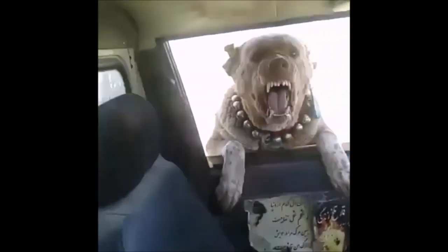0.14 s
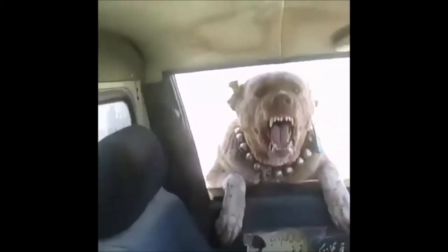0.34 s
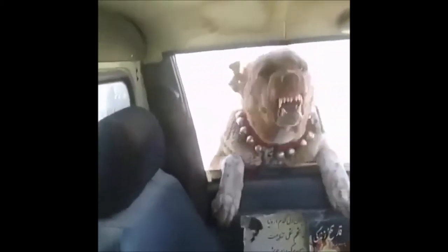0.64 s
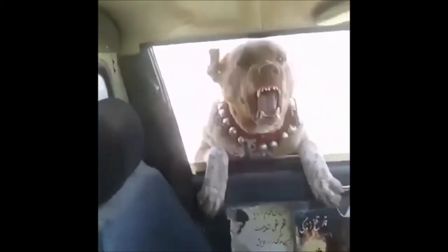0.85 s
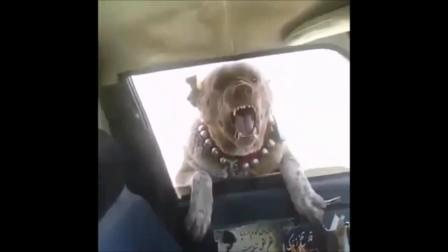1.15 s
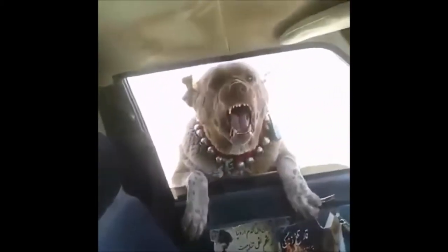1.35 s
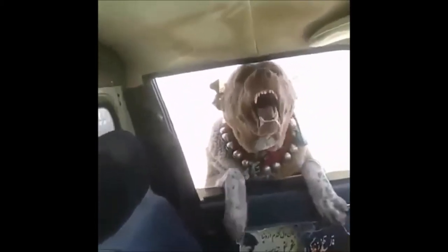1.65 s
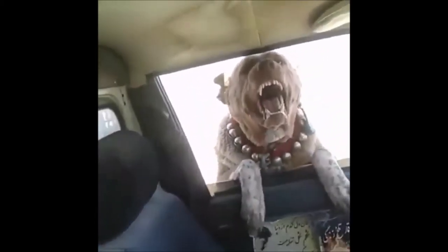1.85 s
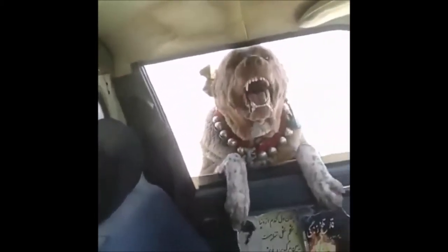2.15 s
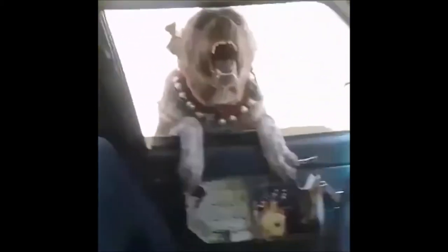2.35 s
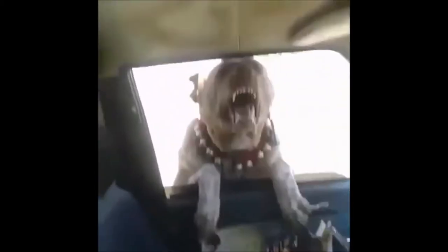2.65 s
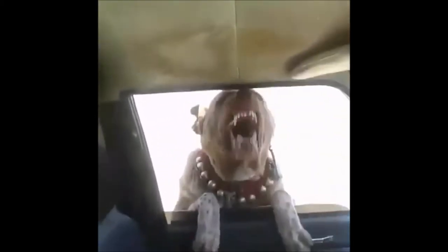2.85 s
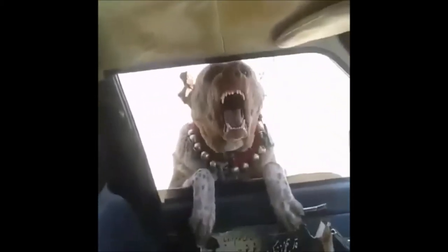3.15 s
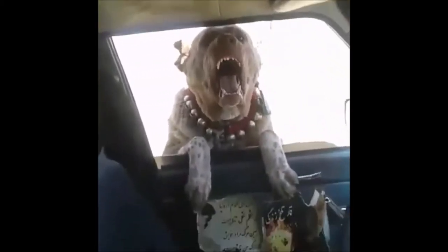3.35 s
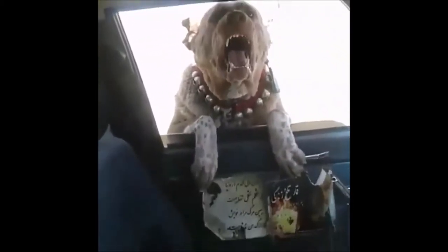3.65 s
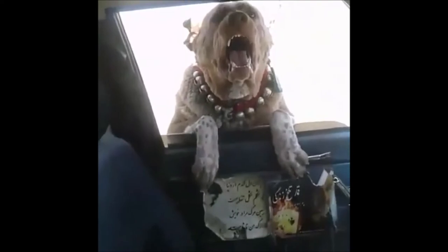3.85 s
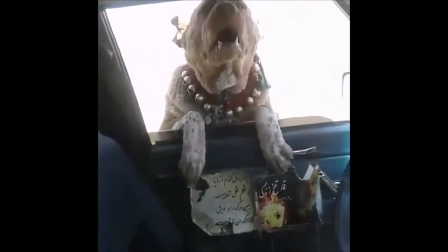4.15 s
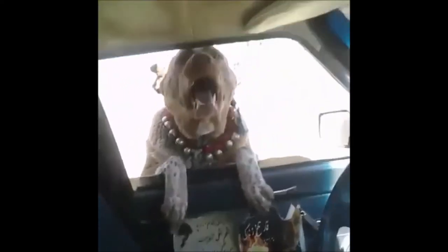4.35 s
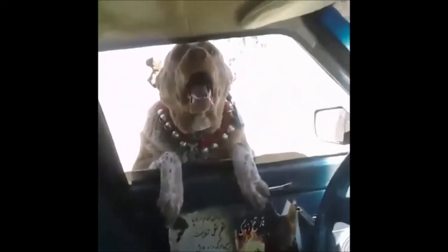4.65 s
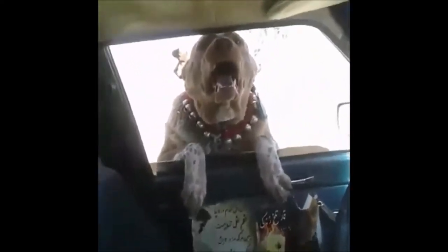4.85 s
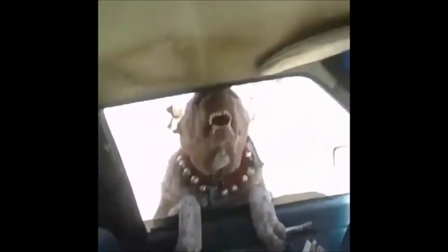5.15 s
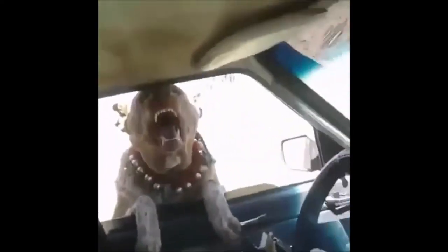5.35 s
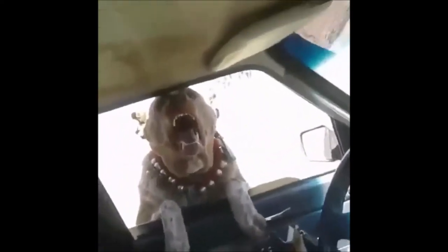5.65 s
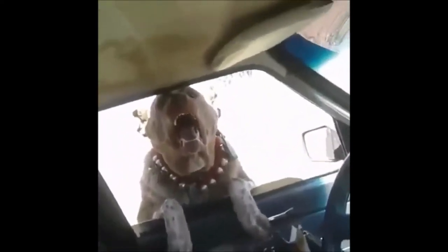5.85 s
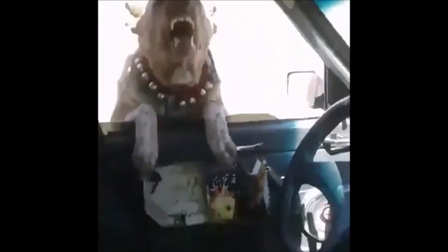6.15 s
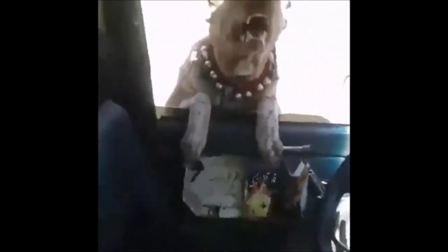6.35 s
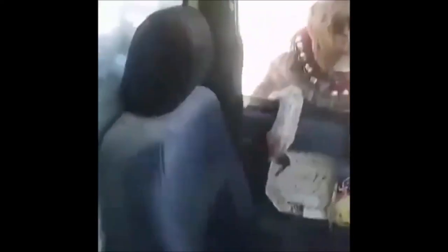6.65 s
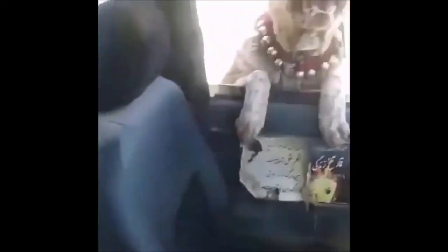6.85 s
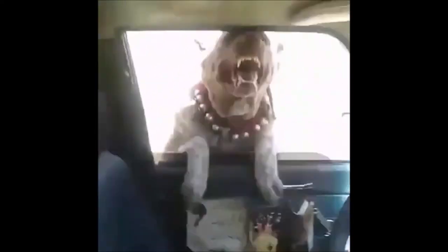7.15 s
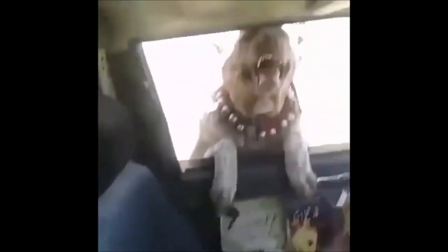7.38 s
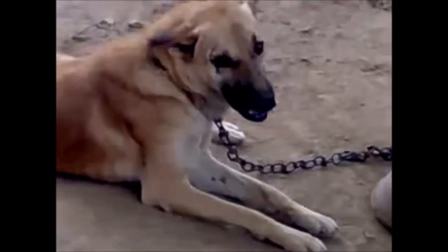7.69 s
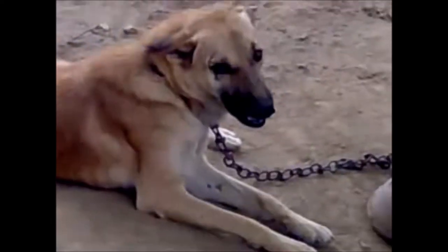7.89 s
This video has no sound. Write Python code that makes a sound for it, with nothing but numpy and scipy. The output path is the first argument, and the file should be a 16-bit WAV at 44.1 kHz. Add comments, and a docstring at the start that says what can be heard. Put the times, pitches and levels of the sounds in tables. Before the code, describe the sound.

Close, loud and slightly overdriven: a heavy dog draws snarling, hissing breaths and throws out single rough barks about a second apart, each running out in a huff or a slow throaty growl. Air whistles briefly past the teeth and a claw ticks once. Near the end the fury cuts off; faint outdoor air, a muffled low moan, a thin whine and a tiny metallic tick remain.

```python
"""Inside a car cabin, a big dog rages through the open window; then a quiet yard with a dog most likely at rest.
Snarling in-breaths flutter the soft palate in hiss; barks are rough vocal-fold pulses sent through resonances.
Each bark runs out in a huff of turbulent noise or a growl of slow throat closures; teeth whistle, a claw ticks.
The fury stops dead: a closed-mouth moan of few harmonics, a faint whine and one tick of a chain follow."""
import sys
import numpy as np
from scipy import signal
from scipy.fft import rfft, irfft, next_fast_len
from scipy.io import wavfile
from scipy.ndimage import uniform_filter1d

SR = 44100
rng = np.random.default_rng(int(sys.argv[2]) if len(sys.argv) > 2 else 0)


def file_out(sig):
    """Save sig as 16-bit WAV at sys.argv[1]."""
    # one column per channel
    cols = np.atleast_2d(sig).T
    # limit, then scale
    lim = np.clip(cols, -1, 1)
    pcm = np.round(lim * 32767).astype(np.int16)
    wavfile.write(sys.argv[1], SR, pcm)


N = 353682
TIME = np.arange(N) / SR
FFT_SIZE = 2 * next_fast_len(N // 2 + SR // 4)
HZ = np.maximum(np.arange(FFT_SIZE // 2 + 1) * SR / FFT_SIZE, 1)
THROAT_TOP_HZ, MOUTH_TOP_HZ = 820, 3200  # borders between the throat, mouth and hiss registers

# barks: start_s, crest_after_s, length_s, sag_db_per_s, throat_db, mouth_db, hiss_db,
# mouth_resonance_hz, closing_fall_hz (fall of pitch); the register shape scales the crest time and adds to the sag
BARKS = [(0.599, 0.1, .19, 99.5, -9.5, -18, -21.5, 1360, 48),
         (1.526, 0.11, .2, 90, -11.5, -20.5, -23, 1180, 12),
         (2.856, 0.19, .205, 88, -6, -20, -20.5, 1327, 68),
         (4.077, 0.07, .19, 49, -7.5, -19, -23, 1264, 16),
         (5.035, 0.12, .175, 56, -10.5, -20.5, -24, 1330, 48),
         (6.109, 0.12, .205, 77, -12, -19, -23.5, 1220, 10)]
# hard slaps of the throat within a growl: time_s, band_gain_db (gain of one band at the slap)
SLAPS = [(1.784, 6), (2.113, 2), (2.223, 0), (2.658, 6), (2.686, -1), (2.765, -2), (6.415, 6), (6.502, 9.5),
         (6.573, 7), (6.851, 4), (6.93, 6), (7.048, 7.5), (7.088, 0), (7.167, 5), (7.299, 4), (7.341, 3),
         (7.423, 2)]


def from_db(db):
    """Level to amplitude: 20 dB is a factor of ten."""
    return 10 ** (np.asarray(db) / 20)


def rms_one(x):
    """Normalization to unit mean power."""
    return x / np.sqrt(np.mean(x ** 2) + 1e-20)


def in_time(rows):
    """Linear interpolation of each column of a curve, sample by sample."""
    s, *columns = np.transpose(rows)
    return [np.interp(TIME, s, column) for column in columns]


def drift(per_s):
    """Slow random modulation: unit-power noise with per_s random points a second, joined by lines."""
    return rms_one(np.interp(TIME * per_s, np.arange(N // 20), rng.standard_normal(N // 20)))


def cut(x, hz, kind, order=2):
    """Butterworth filtering: a maximally flat passband."""
    return signal.sosfilt(signal.butter(order, hz, kind, fs=SR, output="sos"), x + 1e-18)


def spectrum_db(points):
    """Spectral envelope: levels interpolated over the logarithm of frequency."""
    hz, db = np.transpose(points)
    return np.interp(np.log(HZ), np.log(hz), db)


def lifts(modes):
    """Resonance: a bell of gain in dB round each mode, the width taken at half its dB."""
    return sum(db / (1 + (2 * (HZ - hz) / width) ** 2) for hz, width, db in modes)


def resonate(x, db):
    """Causal (minimum-phase) filtering of the given gain: resonances ring after each pulse."""
    cepstrum = irfft(np.log(from_db(db)))
    # fold the cepstrum onto positive times
    cepstrum[1:FFT_SIZE // 2] *= 2
    cepstrum[FFT_SIZE // 2 + 1:] = 0
    return irfft(rfft(x, FFT_SIZE) * np.exp(rfft(cepstrum)))[:N]


def glide(x, hz, width_hz, lift_db):
    """Resonance with a moving centre: the signal is shifted to zero frequency, smoothed and shifted back."""
    turn = np.exp(2j * np.pi * np.cumsum(hz) / SR)
    r = np.exp(-np.pi * width_hz / SR)
    band = 2 * np.real(turn * signal.lfilter([1 - r], [1, -r], x / turn))
    return x + (from_db(lift_db) - 1) * band


def swell(s, length):
    """Gaussian envelope of height 1, its length taken between the 1/e points."""
    return np.exp(-np.minimum((2 * (TIME - s) / length) ** 2, 60))


def dying(clicks, length_s):
    """Damped decay: each click falls exponentially, to 1/e in length_s."""
    return signal.lfilter([1], [1, -np.exp(-1 / (length_s * SR))], clicks + 1e-18)


def tick(at_s, level_db, t60, low_hz, high_hz):
    """Impact: a small hard contact bursts into band noise that decays by 60 dB in t60 seconds."""
    age = TIME - at_s
    noise = rms_one(cut(rng.standard_normal(N), [low_hz, high_hz], "band"))
    return from_db(level_db - 60 * np.abs(age) / t60) * (age > 0) * noise


def hush():
    """Background noise: a faint rush of random pressure, low-passed at 6 dB per octave."""
    return from_db(-70.5) * rms_one(cut(rng.standard_normal(N), 900, "low", order=1))


def yard_air():
    """Coloured noise: outdoor air round the resting dog, shaped by a spectral envelope."""
    # spectrum of the outdoor air: frequency_hz, relative_level_db
    air_colour = [(18, -51), (30, -7.5), (57, -11), (115, -31), (174, -34.5), (3370, -39), (7000, -43),
                  (9100, -94)]
    return from_db(-56.0) * rms_one(resonate(rng.standard_normal(N), spectrum_db(air_colour)))


def whine(at_s=7.79, length_s=0.22, hz=2290, level_db=-66):
    """Frequency glide: a thin, faint whistle that slides up and holds."""
    pitch = hz * (1 - .16 * np.clip((at_s - TIME) / length_s * 2, 0, 1) ** 2)
    return from_db(level_db) * swell(at_s, length_s) * np.sin(2 * np.pi * np.cumsum(pitch) / SR)


def moan():
    """Harmonic series behind a closed muzzle, which lets only the lowest harmonics out."""
    # course of the moan: time_s, pitch_hz, level_db
    course = [(7.606, 134.5, -43), (7.8, 125.5, -43), (7.85, 114, -43), (7.87, 97.9, -59),
              (8.02, 91.4, -86)]
    # harmonics: multiple of the pitch, relative_level_db
    harmonics = [(1, 16), (2, 9), (3, -13)]
    hz, db = in_time(course)
    angle = 2 * np.pi * np.cumsum(hz * (1 + 0.01 * drift(80))) / SR
    tone = sum(from_db(level) * np.cos(round(k) * angle) for k, level in harmonics)
    return from_db(db + 1.4 * drift(85)) * rms_one(tone)


def cabin(x, t60=0.019, wet_db=-5):
    """Reverberation: dense, short reflections off glass and upholstery."""
    t = TIME[:SR // 5]
    echoes = rng.standard_normal(len(t)) * from_db(-60 * t / t60) * (t > .002)
    return x + from_db(wet_db) * signal.fftconvolve(x, echoes / np.linalg.norm(echoes))[:N]


def sway(x, sway_s=.00008):
    """Comb filtering: near echoes ripple the hiss; the ripples wander slowly."""
    # echoes off window frame and roof: lag_s, amplitude_ratio
    near_echoes = [(.0007, 0.18), (.0029, 0.086), (.0043, 0.3)]
    return x + sum(echo * np.interp(TIME - lag - sway_s * drift(4), TIME, x) for lag, echo in near_echoes)


def effort(breaths, shape):
    """Breath envelope: throat, mouth and hiss levels in dB open, climb to a crest, sag and close."""
    closing_db, opening_db_per_s = 59.5, 4991.5  # depth at the end of a breath; snap of the airway opening
    levels = np.full((3, N), -120.0)
    for breath in breaths:
        start, crest_s, length, sag, *crest_db = breath[:7]
        age = TIME - start
        for k, (share, rise, added_sag, attack_db, attack_s, release_s) in enumerate(shape):
            past = age - share * crest_s
            arch = np.where(past < 0, rise * past, -(sag + added_sag) * past)
            attack = attack_db * np.maximum(1 - age / attack_s, 0) ** 2
            opening = attack + opening_db_per_s * np.maximum(-age, 0)
            closing = closing_db * np.maximum(1 - (length - age) / release_s, 0) ** 2
            levels[k] = np.maximum(levels[k], crest_db[k] + arch - opening - closing)
    return levels


def breathe(voice, air, colour, levels_db, steady_s, throat_share=1):
    """Source and filter: voice and air pass the resonances; three registers then follow the breath's effort."""
    # resonances of muzzle and cabin: frequency_hz, width_hz, lift_db
    body_modes = [(116, 87, 7), (218.4, 212, 15.5), (443, 119, 11.5), (590, 92.3, 21.5), (659.7, 96, 21.5),
                  (686, 19, 4.5), (937, 115, 8), (1071.5, 120, 7.5), (1239, 25, 8), (1459, 140, 8),
                  (1587, 45, 7), (1834, 36, 9), (2006, 69, 8.5), (2190, 22, 11), (4700, 38, 10),
                  (6160, 170, 4)]
    gain_db = spectrum_db(colour) + lifts(body_modes)
    voice, air = resonate(voice, gain_db), resonate(air, gain_db)
    throat = rms_one(cut(voice, THROAT_TOP_HZ, "low", order=6))
    mouth = cut(voice + air, [THROAT_TOP_HZ, MOUTH_TOP_HZ], "band", order=6)
    hiss = sway(cut(air, MOUTH_TOP_HZ, "high", order=6))
    out = 0
    for register, db, share in zip((throat, mouth, hiss), levels_db, (throat_share, 1, 1)):
        even = rms_one(register)
        power = uniform_filter1d(even ** 2, int(steady_s * SR))  # slow swings are levelled out
        out = out + share * from_db(db) * even / np.sqrt(np.abs(power) + 1e-6)
    return out


def progress(breaths):
    """Phase of breathing: share 0-1 of the current breath that has passed, and its mouth resonance in Hz."""
    rows = np.array(breaths)
    current = rows[np.maximum(np.searchsorted(rows[:, 0], TIME) - 1, 0)]
    return np.clip((TIME - current[:, 0]) / current[:, 2], 0, 1), current[:, 7]


def mouth_ring(x, breaths, width_hz, lift_db, droop, shake=0.027):
    """Cavity resonance: each breath has its own, which shakes with the jowls and sinks as the jaws close."""
    passed, hz = progress(breaths)
    return glide(x, hz * (1 - droop * passed ** 2 + shake * drift(35)), width_hz, lift_db)


def past_teeth(air, width_hz, lift_db, upper_db, shake=0.03):
    """Two resonances of the gap between tongue and teeth colour the air and slide with the tongue."""
    # lower resonance of the gap in barks and huffs, before its shake: time_s, frequency_hz
    gap_course = [(.63, 3740), (.71, 5780), (.76, 4280), (.81, 5300), (.95, 4480), (1.535, 5630),
                  (1.62, 4300), (1.7, 5600), (2.86, 6000), (2.93, 4400), (3.06, 3930), (4.12, 4650),
                  (4.24, 4100), (5.14, 4510), (5.19, 5540), (5.26, 4300), (5.33, 5100), (6.13, 5280),
                  (6.19, 4150)]
    hz = in_time(gap_course)[0] * (1 + shake * drift(60))
    lower = glide(air, hz, width_hz, lift_db)
    return glide(lower, 1.55 * hz, width_hz, upper_db)


def beat(hz, jitter, restarts=()):
    """Uneven oscillation that starts afresh at each slap: number of the running cycle, and phase 0-1 in it."""
    cycles = np.cumsum(hz * np.exp(jitter * drift(np.mean(hz)))) / SR
    for s, _ in restarts:
        at = int(s * SR)
        cycles[at:] = cycles[at:] - cycles[at] + np.ceil(cycles[at])
    return cycles.astype(int), cycles % 1


def pulses(cycle, spread_db):
    """Pulse excitation: one click of random strength as each cycle starts."""
    return np.diff(cycle, prepend=0) * from_db(spread_db * rng.standard_normal(N)[cycle])


def whistles(waver=0.022):
    """Whistle tones: air past the teeth sounds as brief sine tones of wavering pitch in the huff."""
    # whistles: centre_s, length_s, pitch_hz (mean), level_db (peak)
    tones = [(0.825, 0.026, 3550, -16), (0.873, 0.1, 3324, -29.5)]
    wobble = np.cumsum(1 + waver * drift(290)) / SR
    return sum(from_db(db) * swell(s, length) * np.sin(2 * np.pi * hz * wobble) for s, length, hz, db in tones)


def huffs():
    """Turbulence: the rest of the breath rushes out unvoiced, as noise through the mouth's resonances."""
    # huffs after a bark or within a growl: start_s, crest_after_s, length_s, sag_db_per_s,
    # throat_db, mouth_db, hiss_db, mouth_resonance_hz
    huff_breaths = [(0.717, 0.045, 0.31, 78, -28.5, -28.5, -22, 1240),
                    (3.014, 0.036, 0.22, 44, -32.5, -32.5, -27.5, 1370),
                    (4.196, 0.056, 0.27, 107, -33.5, -25, -27.5, 1460),
                    (5.152, 0.16, 0.33, 55, -31.5, -29, -24.5, 1470),
                    (6.198, 0.038, 0.2, 143, -33, -26.5, -30.5, 1470),
                    (7.19, .06, 0.15, 34, -41, -27.5, -31.5, 2320)]
    # response of throat, mouth and hiss (one row each): share of the time to the crest, rise_db_per_s,
    # added_sag_db_per_s, attack_depth_db, attack_s, release_s
    huff_shape = [(.9, 8.1, 44, 30, 0.03, 0.081), (1, 47, -16.5, 30, 0.05, 0.095),
                  (1, 51, -2, 30, 0.026, 0.1)]
    # colour of the throat: frequency_hz, gain_db
    huff_colour = [(50, -29), (170, -18.5), (330, -19), (800, -25), (1300, -25.5), (2200, -17), (3200, -14),
                   (4300, -19), (6300, -23.5), (8000, -25.5), (9500, -36)]
    # antiresonance of the muzzle: frequency_hz, width_hz, lift_db
    huff_hollow = [(2880, 350, -8)]
    air = cabin(rng.standard_normal(N) * from_db(3.0 * drift(70)))
    air = mouth_ring(air, huff_breaths, width_hz=140, lift_db=7.5, droop=.02)
    air = resonate(past_teeth(air, width_hz=530, lift_db=3, upper_db=-2), lifts(huff_hollow))
    return breathe(air, air, huff_colour, effort(huff_breaths, huff_shape), steady_s=0.03)


def snorts(hz=625, length_s=0.011):
    """Impulse response: a single hard flap rings the throat for a few cycles."""
    # hard flaps: time_s, peak_db
    hard_flaps = [(0.218, -17.5), (.273, -21), (1.15, -21), (1.248, -20.5), (3.775, -19.5), (3.875, -17),
                  (5.75, -17), (5.827, -22)]
    envelope = sum(from_db(db) * swell(s, length_s) for s, db in hard_flaps)
    return envelope * np.sin(2 * np.pi * np.cumsum(hz * (1 + 0.0253 * drift(60))) / SR)


def palate():
    """Flutter of the soft palate: number of the running flap, and the time in s from its middle."""
    # flutter: start_s (of a flap), flaps_per_s (from there on)
    flutter = [(-.095, 38), (.273, 35.6), (.968, 39.3), (1.273, 36.1), (3.153, 35.25), (3.55, 40.2),
               (4.396, 29), (4.534, 38.7), (4.689, 41.9), (4.856, 43.3), (5.44, 38.3), (5.701, 39.5),
               (5.853, 40.6)]
    rows = np.array(flutter)
    start, per_s = rows[np.searchsorted(rows[:, 0], TIME) - 1].T
    turns = (TIME - start) * per_s + .03 * drift(30) + .5
    flap = np.cumsum(np.diff(turns % 1, prepend=0) < -.5)
    return flap, (turns % 1 - .5) / per_s


def snarls(thump_hz=215, rasp_db=-9, leak=0.21, chop=0.1):
    """Flow-driven flutter: drawn air flaps the palate; each flap thumps with a puff of rasp and chops the hiss."""
    # snarling in-breaths: start_s, crest_after_s, length_s, sag_db_per_s (after the crest),
    # throat_db, mouth_db, hiss_db, mouth_resonance_hz
    snarl_breaths = [(-0.1, 0.23, 0.74, 6.5, -30.5, -28, -25, 1605),
                     (0.954, 0.13, 0.57, 6.5, -32.5, -32.5, -29.5, 1453),
                     (3.167, 0.077, 0.92, -7, -34.5, -36, -31, 1457),
                     (4.405, 0.17, 0.65, 5, -31, -33.5, -32, 1442),
                     (5.434, 0.28, 0.64, 2, -30.5, -31, -29, 1483)]
    # response of throat, mouth and hiss (one row each): share of the time to the crest, rise_db_per_s,
    # added_sag_db_per_s, attack_depth_db, attack_s, release_s
    snarl_shape = [(0.79, 14, 2.5, 27.5, 0.15, 0.088), (0.84, 6, 7.5, 21.5, 0.25, 0.088),
                   (0.96, 34.5, 15, 59, 0.063, 0.088)]
    # colour of the throat: frequency_hz, gain_db
    snarl_colour = [(50, -3), (110, -0.5), (220, 0), (380, -5), (800, -8), (1300, -7.5), (2200, -10),
                    (3200, 3.5), (4300, -1.5), (6300, 2), (8000, -0.5), (9500, -13)]
    # the drawn-back lips: frequency_hz, width_hz, lift_db
    curled_lips = [(2607, 220, -4.5)]
    flap, age = palate()
    size, pitch, turn = rng.standard_normal((N // 20, 3))[flap].T  # each flap differs
    opening = np.exp(-(age / .0052) ** 2) * from_db(1.2 * size)
    thump_angle = 2 * np.pi * (thump_hz * np.exp(.13 * pitch) * age + turn)
    thump = rms_one(opening * np.sin(thump_angle))
    rasp = rms_one(rng.standard_normal(N) * (opening + leak))
    voice = from_db(-29) * thump + from_db(rasp_db) * cut(rasp, 300, "high", order=1)
    air = cabin(rng.standard_normal(N) * (1 + 2 * chop * opening) * from_db(1.5 * drift(150)))
    voice, air = [mouth_ring(resonate(x, lifts(curled_lips)), snarl_breaths, width_hz=58, lift_db=11, droop=0.038)
                  for x in (voice, air)]
    levels_db = effort(snarl_breaths, snarl_shape)
    return breathe(rms_one(voice), from_db(13.5) * rms_one(air), snarl_colour, levels_db, steady_s=0.064)


def growl_effort():
    """Growl envelope: throat, mouth and hiss levels in dB ebb and build, and fade quickly at both ends."""
    # the two long growls: time_s, throat_db, mouth_db (above throat), hiss_db (above throat)
    growl_courses = [
        [(1.69, -22.5, -7.5, -13), (1.74, -32, -4, -9), (1.796, -33.5, 0, -3.5), (2.008, -39, 4, -3.5),
         (2.072, -37, 0, -9.5), (2.358, -39.5, -3, -5.5), (2.526, -25.5, -4.5, -11), (2.66, -26, -8.5, -11.5),
         (2.834, -15, -8, -12.5), (2.87, -17.5, -14, -8.5)],
        [(6.28, -24.5, -14, -14), (6.335, -29, -4, -9.5), (6.387, -24.5, -4, -22.5), (6.453, -30, -8, -17),
         (6.771, -42, 1, -3.5), (6.975, -37.5, 5, -2), (7.01, -40, 3.5, 0.5), (7.165, -31.5, 3, -4.5),
         (7.553, -22, 2, -4), (7.6, -18.5, 0.5, -3)],
    ]
    throat_db, mouth_db, hiss_db = in_time(np.vstack(growl_courses))
    outside_s = np.min([np.abs(TIME - np.clip(TIME, rows[0][0], rows[-1][0])) for rows in growl_courses], axis=0)
    db = throat_db - np.minimum(591.5 * outside_s, 100)  # fade in dB per s, and its limit in dB
    return db, db + mouth_db, db + hiss_db


def slur(x, spread_s):
    """Dispersion: wet tissue parts gradually, so each snap slides down from the treble through the mouth's range."""
    delay_s = spread_s * np.clip(1 - HZ / MOUTH_TOP_HZ, 0, 1)
    phase = 2 * np.pi * np.cumsum(delay_s) * SR / FFT_SIZE
    return irfft(rfft(x, FFT_SIZE) * np.exp(-1j * phase))[:N]


def jaws(x, gape):
    """Moving formants: the growl's resonances pass from shut through ajar to open as the jaws part."""
    # jaws nearly shut: frequency_hz, width_hz, lift_db
    shut = [(640, 160, 19), (1050, 400, -4), (1450, 150, 17.5), (2130, 390, 9), (3300, 1300, -7)]
    # jaws ajar: frequency_hz, width_hz, lift_db
    ajar = [(700, 260, 15), (1392, 200, 9.5), (2300, 420, 2), (2620, 930, 9.5), (3440, 690, -12.5),
            (8700, 1900, 11)]
    # jaws open, teeth bared: frequency_hz, width_hz, lift_db
    bared = [(610, 120, -1), (756, 118, 26), (1323, 150, 11), (1790, 550, 14.5), (2340, 180, 6),
             (8300, 1200, -2)]
    position = 2 * np.clip(gape, 0, 1)
    return sum(np.maximum(1 - np.abs(position - k), 0) * resonate(x, lifts(posture))
               for k, posture in enumerate((shut, ajar, bared)))


def slapped(x, band_hz, length_s):
    """Transient gain: one band of the sound jumps at each hard slap and dies back."""
    kicks = np.zeros(N)
    for s, db in SLAPS:
        kicks[int(s * SR)] = from_db(db) - 1
    return x + cut(x * dying(kicks, length_s), band_hz, "band")


def growls(splash_db=-1.5, splash_s=0.0044, rebound=0.47, rebound_s=0.005634, air_db=-14, steady_air=0.21):
    """Slow pulse train: each throat closure is a snap with a short wet splash and a weaker rebound."""
    # beat of the growl, before jitter: time_s, pulses_per_s
    growl_rate = [(1.75, 76), (2.05, 82), (2.2, 75), (2.4, 82), (2.82, 80),   (6.35, 71), (7.2, 76),
                  (7.6, 75)]
    # gape of the jaws: time_s, gape (0 shut to 1 teeth bared)
    growl_gape = [(1.72, .1), (1.8, 0.66), (2.85, 0.39), (6.3, 0.044), (6.52, 0.0011), (6.7, 0.75),
                  (6.9, 1), (7.6, 0.82)]
    # colour of the throat: frequency_hz, gain_db
    growl_colour = [(50, 2.5), (150, -0.5), (330, -2), (800, -13), (1300, -14), (2200, -5.5), (3200, -18.5),
                    (4300, -26.5), (6300, -17.5), (8000, -31), (9500, -38)]
    # antiresonances of the muzzle: frequency_hz, width_hz, lift_db
    growl_hollow = [(1175, 110, -5), (3316, 240, -8.5), (4080, 800, -6)]
    per_s, = in_time(growl_rate)
    gape, = in_time(growl_gape)
    cycle, _ = beat(per_s, jitter=.021, restarts=SLAPS)
    closures = pulses(cycle, spread_db=1.9)
    closures = closures + rebound * np.roll(closures, int(rebound_s * SR)) * from_db(2.5 * drift(80))
    splash = rms_one(dying(closures, splash_s))
    snaps = rms_one(slur(closures, spread_s=.006))
    voice = snaps + from_db(splash_db) * cut((splash + .18) * rng.standard_normal(N), 300, "high")
    voice = resonate(voice, lifts(growl_hollow))
    air = cabin(rng.standard_normal(N) * (splash + steady_air))
    air = from_db(air_db) * rms_one(resonate(air, lifts(growl_hollow)))
    air = glide(air, 6200 * (1 + .07 * drift(45)), width_hz=400, lift_db=6)
    growl = breathe(jaws(voice, gape), jaws(air, gape), growl_colour, growl_effort(), steady_s=0.061)
    return slapped(growl, band_hz=[700, 3000], length_s=.011)


def bark_pitch():
    """Fundamental frequency in Hz: it creeps up through each bark and falls as the jaws close."""
    base_hz, rise_hz_per_s, fall_s = 200.06, 125, .08
    hz = np.full(N, float(base_hz))
    for start, _, length, *_, fall_hz in BARKS:
        age = np.clip(TIME - start, 0, length)
        closing = np.maximum(1 - (length - age) / fall_s, 0)
        pitch = base_hz + rise_hz_per_s * np.minimum(age, length - fall_s) - fall_hz * closing
        hz = np.where(TIME >= start, pitch, hz)
    return hz


def barks(rasp_db=-5, air_db=2, clearing=0.67):
    """Vocal-fold pulses, rough from loose tissue; at moments the third harmonic rings out clear in the throat."""
    # response of throat, mouth and hiss (one row each): share of the time to the crest, rise_db_per_s,
    # added_sag_db_per_s, attack_depth_db, attack_s, release_s
    bark_shape = [(0.91, 111, 14.5, 9.4, 0.04, 0.055), (0.64, 5.8, 3.5, 20, 0.043, 0.053),
                  (0.25, 15, -19, 16.6, 0.027, 0.027)]
    # colour of the throat: frequency_hz, gain_db
    bark_colour = [(50, -39.5), (150, -11), (400, -11), (800, -7.5), (1300, -5), (2200, -13), (2700, -5),
                   (3300, -11), (4300, -5), (6300, -7), (8000, -5.5), (9500, -16.5)]
    # antiresonance of the muzzle: frequency_hz, width_hz, lift_db
    bark_hollow = [(3170, 300, -15)]
    # resonance of the gaping mouth: frequency_hz, width_hz, lift_db
    gaping = [(1850, 150, 7.5)]
    # moments when a bark clears into a ringing tone: centre_s, length_s, peak_db
    rings = [(0.681, 0.016, -8), (0.7, 0.016, -5), (0.729, 0.028, -5.5), (1.619, 0.0074, -6),
             (1.637, 0.018, -4.5), (2.988, .02, -5), (3.011, 0.015, -6), (4.124, 0.026, -7),
             (4.153, .014, -6), (4.198, 0.021, -6.5), (5.112, 0.013, -7), (5.129, .014, -8),
             (5.155, 0.012, -7), (6.207, 0.012, -5.5)]
    cycle, phase = beat(bark_pitch(), jitter=.046)
    folds = rms_one(pulses(cycle, spread_db=3))
    voice = folds + from_db(rasp_db) * rms_one(rng.standard_normal(N) * np.exp(-phase / 0.31))
    air = cabin(rng.standard_normal(N) * np.exp(-phase) * from_db(0.56 * drift(110)))
    air = resonate(past_teeth(air, width_hz=300, lift_db=6.5, upper_db=6), lifts(bark_hollow))
    # a wide mouth radiates more of the upper resonances: wide for 0.37 of the bark, closing over the next 0.2
    gape = np.clip(1 - (progress(BARKS)[0] - 0.37) / 0.2, 0, 1)
    voice, air = [(1 - gape) * x + gape * resonate(x, lifts(gaping)) for x in (voice, air)]
    voice, air = [mouth_ring(x, BARKS, width_hz=160, lift_db=8, droop=0.21, shake=0.12) for x in (voice, air)]
    clear = np.minimum(sum(swell(s, 2 * length) for s, length, _ in rings), 1)
    tone_envelope = sum(from_db(db) * swell(s, length) for s, length, db in rings)
    tone = tone_envelope * np.sin(3 * 2 * np.pi * phase)
    # the rough throat register steps back while the tone rings
    rough = breathe(voice, from_db(air_db) * rms_one(air), bark_colour, effort(BARKS, bark_shape),
                    steady_s=0.021, throat_share=1 - min(clearing, 1) * clear)
    return tone + rough


def scene():
    """Superposition of sources: the raging dog in the car window, then the quiet yard."""
    yard_start_s = 7.606
    chain = tick(at_s=7.857, level_db=-34.0, t60=0.0077, low_hz=2190, high_hz=4970)
    yard = yard_air() + whine() + moan() + chain
    claw = tick(at_s=6.845, level_db=-25, t60=.003, low_hz=2500, high_hz=9500)
    breaths = huffs() + snorts() + snarls() + cut(growls(), 75, "high", order=1) + barks()
    dog = cut(breaths, 34, "high") + whistles() + claw
    # faint stereo width in the treble: opposite signs left and right
    side = from_db(-22.0) * cut(dog * drift(500), 5100, "high", order=8)
    car = dog + hush() + side * np.array([[1], [-1]])
    return np.where(TIME < yard_start_s, car, cut(yard, 6500, "low", order=8))


def record(dry, top=0.7):
    """Saturation and band limit: the loudest peaks are rounded and the treble is cut."""
    treble_cut = signal.ellip(10, .2, 80, 9700, fs=SR, output="sos")  # edge in Hz
    return signal.sosfilt(treble_cut, top * np.tanh(dry / top))


dry = scene()
out = record(dry)
file_out(out)
```